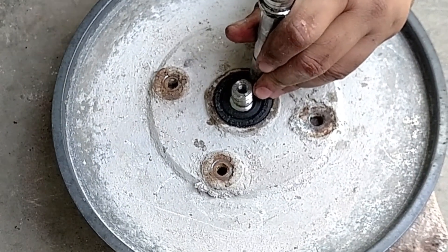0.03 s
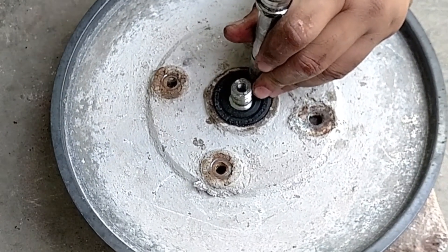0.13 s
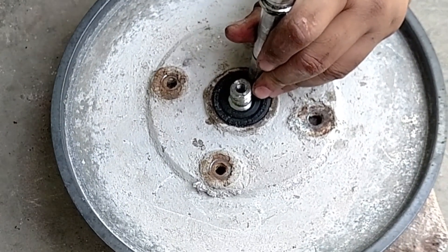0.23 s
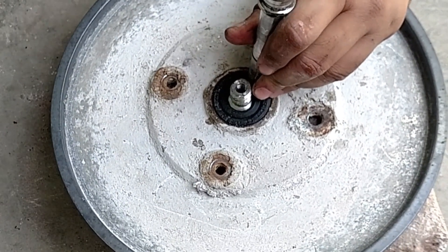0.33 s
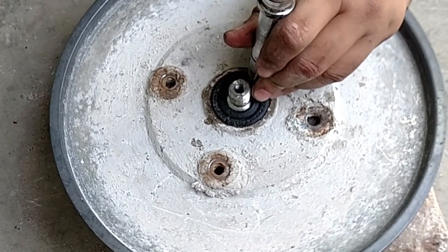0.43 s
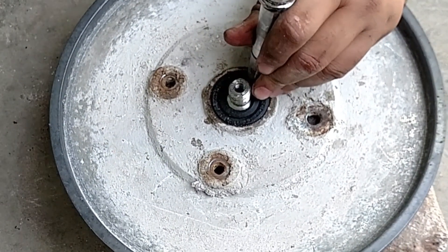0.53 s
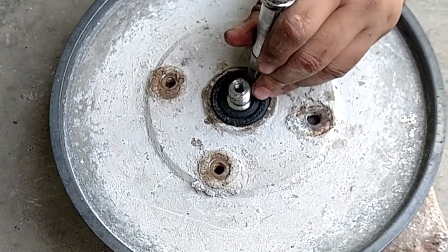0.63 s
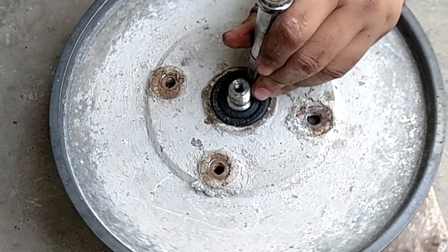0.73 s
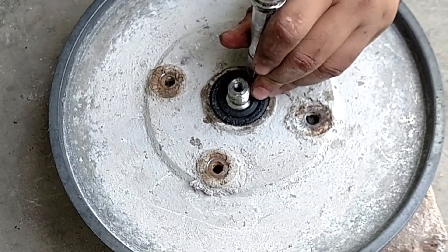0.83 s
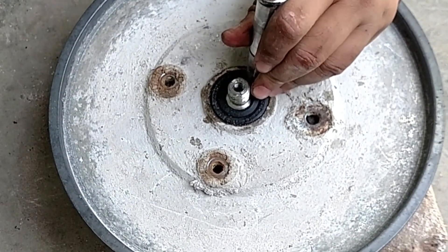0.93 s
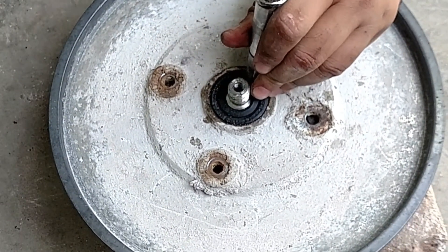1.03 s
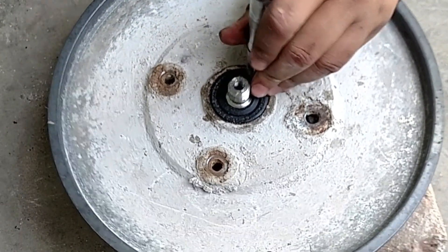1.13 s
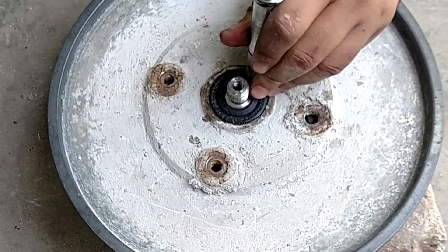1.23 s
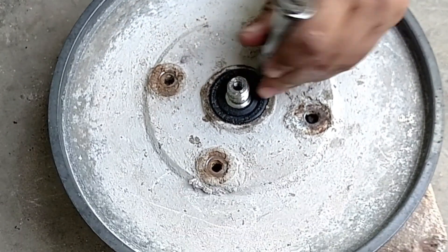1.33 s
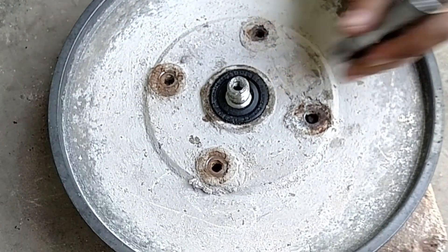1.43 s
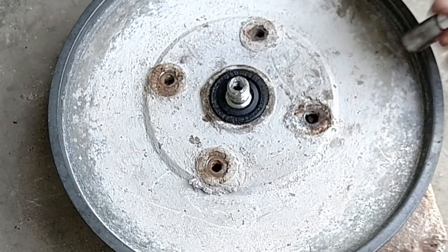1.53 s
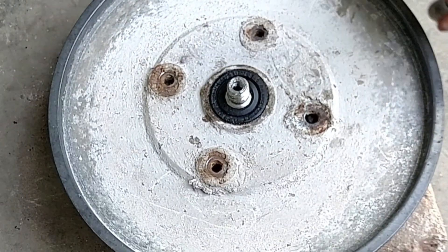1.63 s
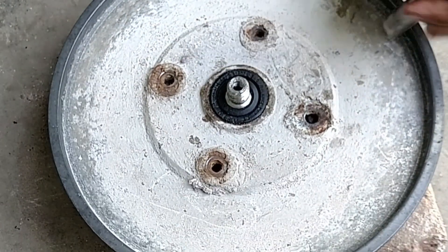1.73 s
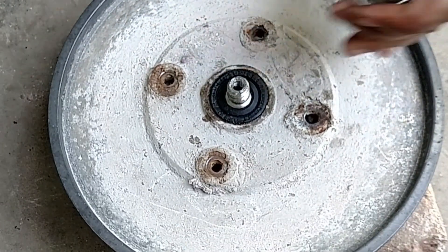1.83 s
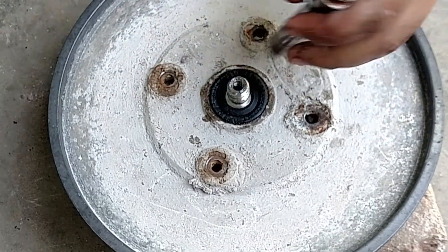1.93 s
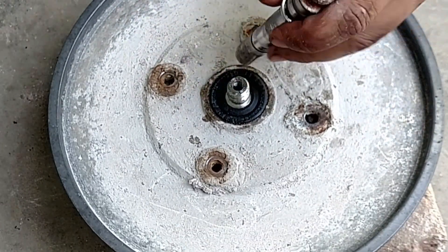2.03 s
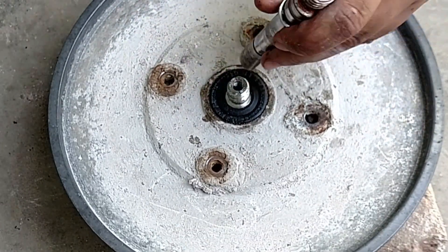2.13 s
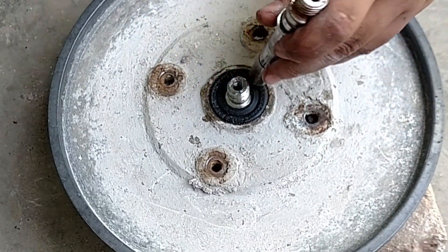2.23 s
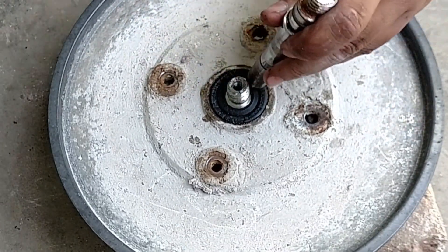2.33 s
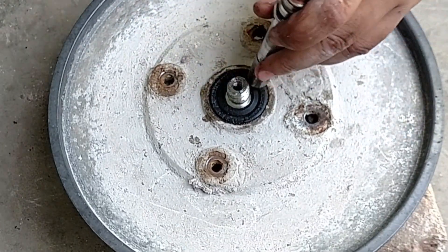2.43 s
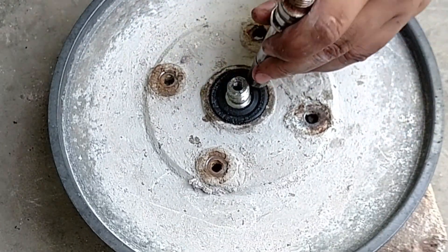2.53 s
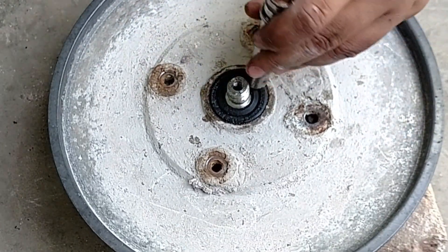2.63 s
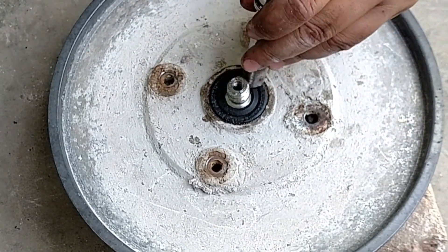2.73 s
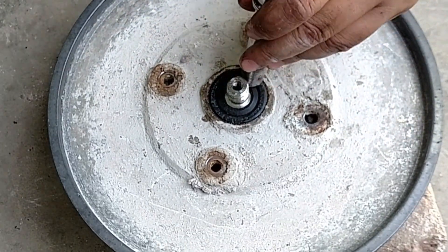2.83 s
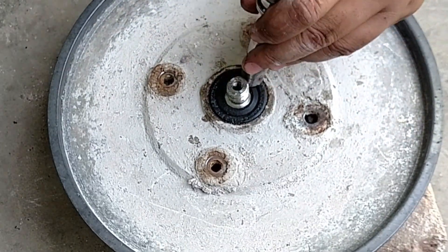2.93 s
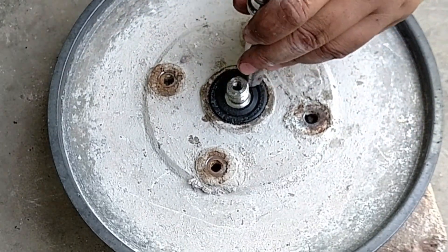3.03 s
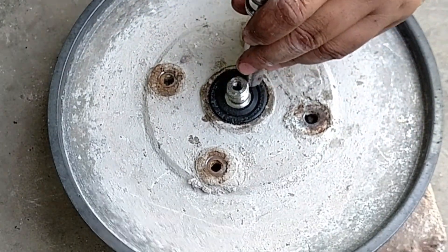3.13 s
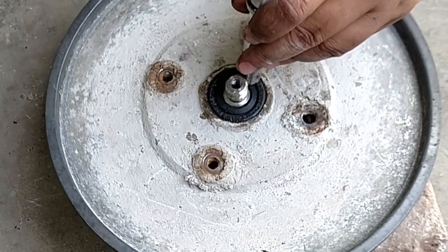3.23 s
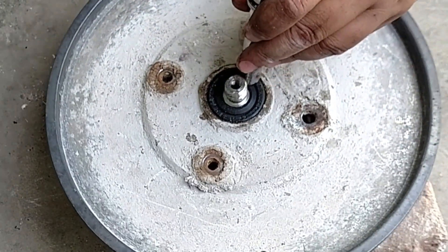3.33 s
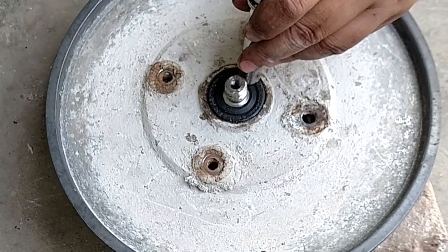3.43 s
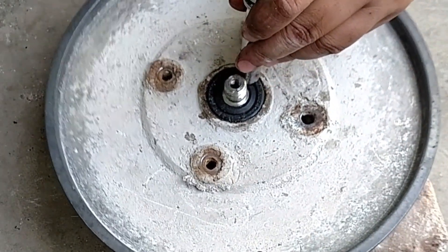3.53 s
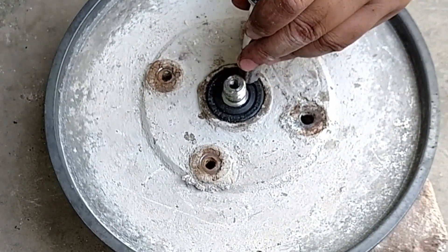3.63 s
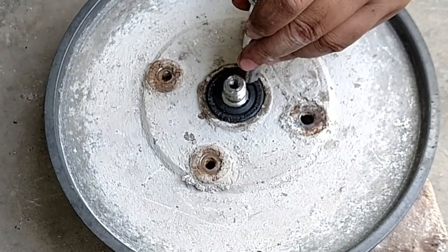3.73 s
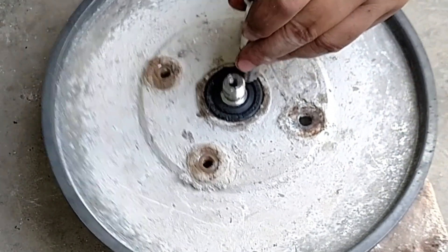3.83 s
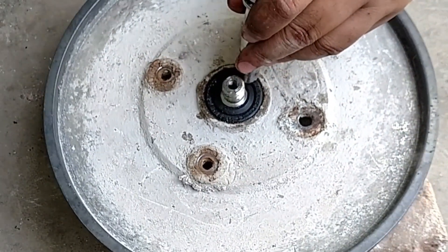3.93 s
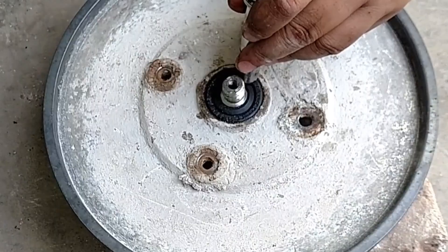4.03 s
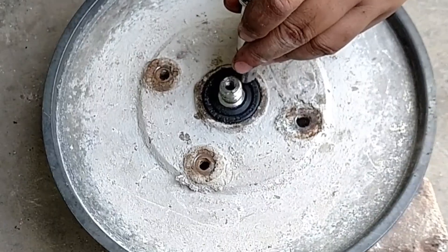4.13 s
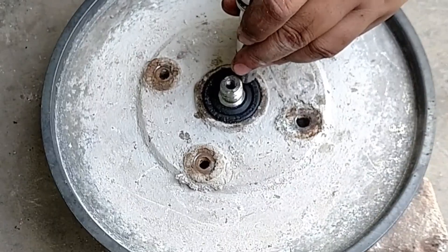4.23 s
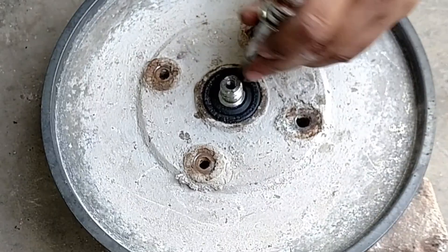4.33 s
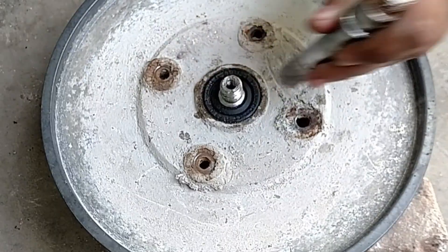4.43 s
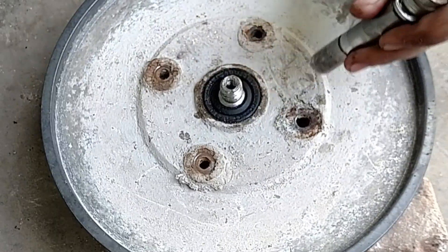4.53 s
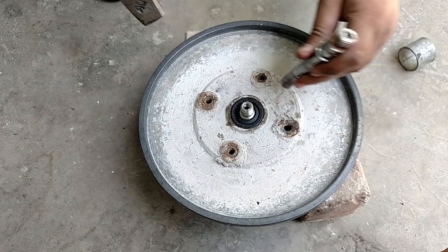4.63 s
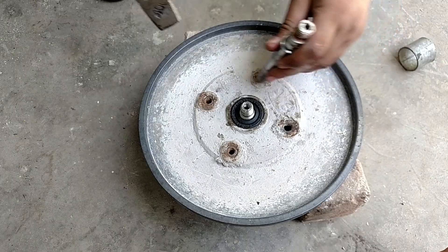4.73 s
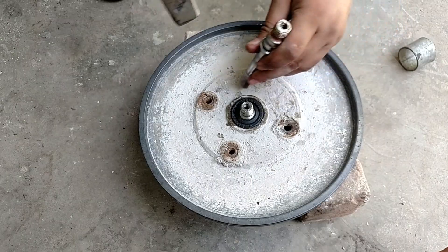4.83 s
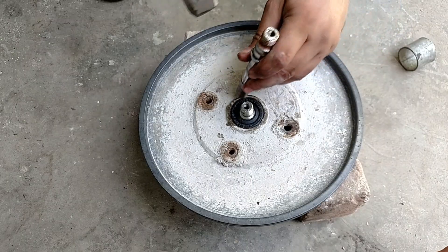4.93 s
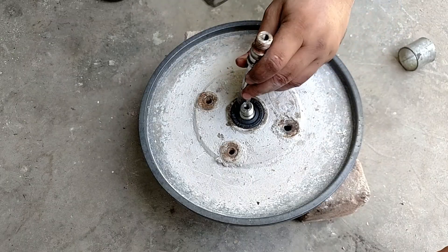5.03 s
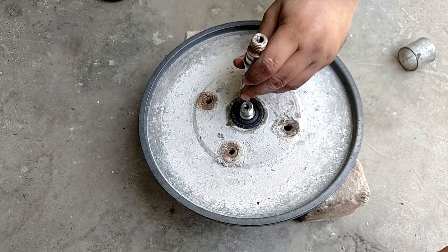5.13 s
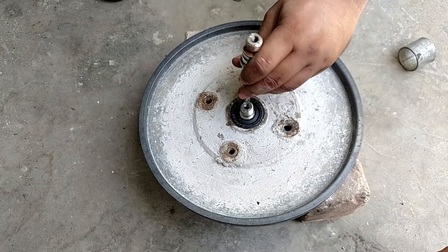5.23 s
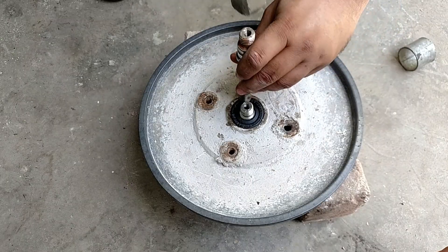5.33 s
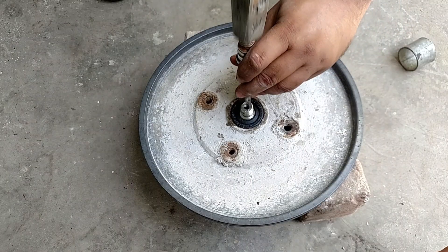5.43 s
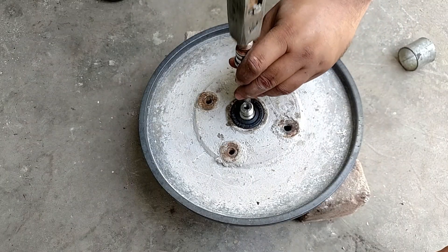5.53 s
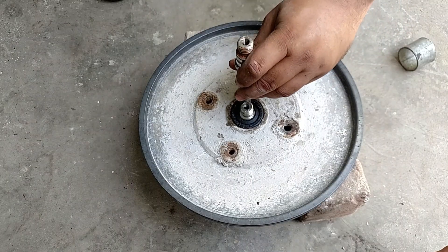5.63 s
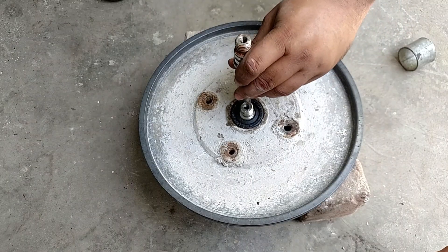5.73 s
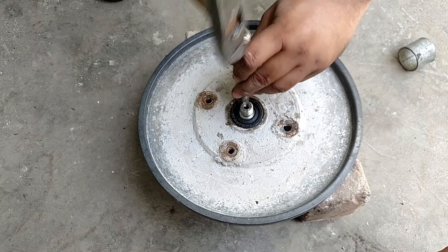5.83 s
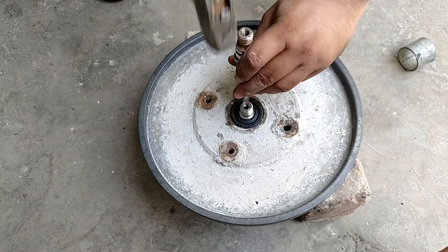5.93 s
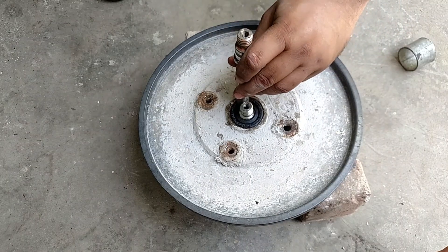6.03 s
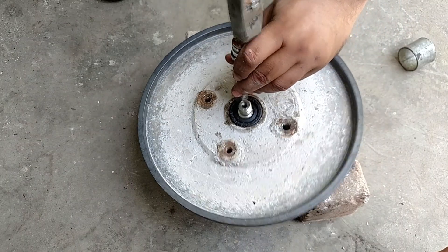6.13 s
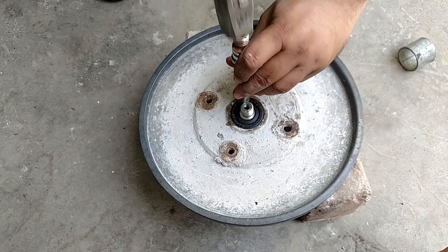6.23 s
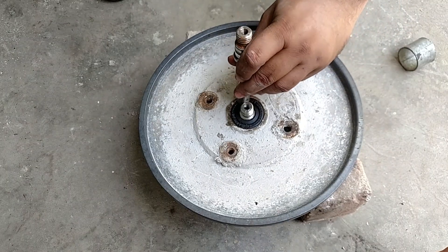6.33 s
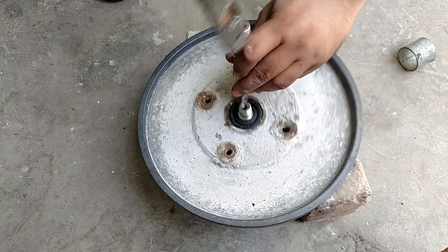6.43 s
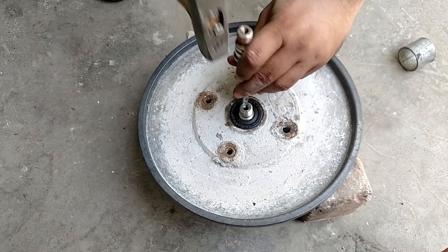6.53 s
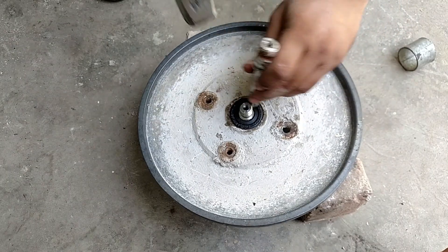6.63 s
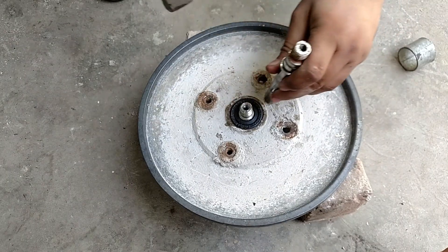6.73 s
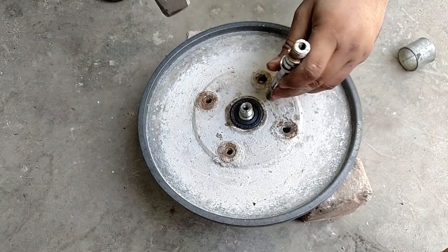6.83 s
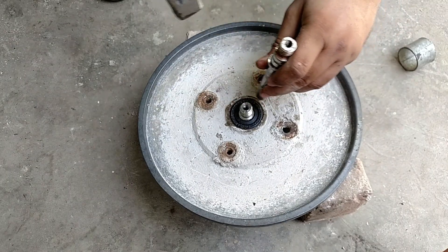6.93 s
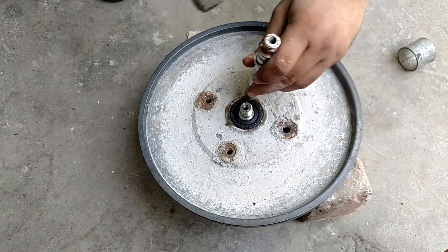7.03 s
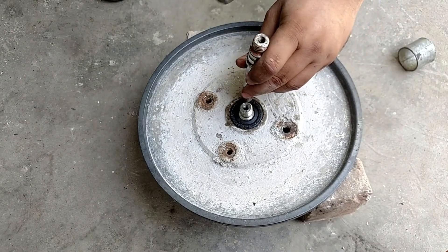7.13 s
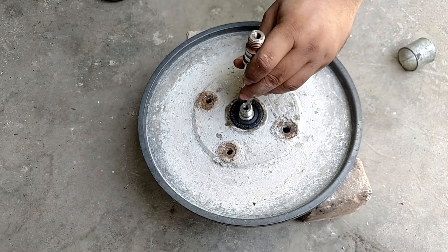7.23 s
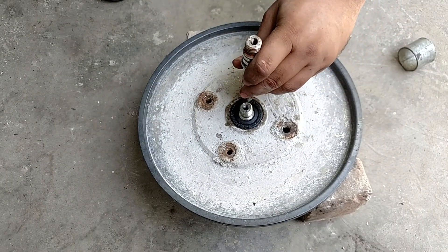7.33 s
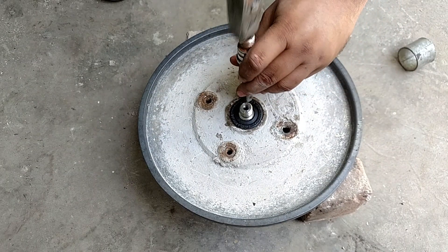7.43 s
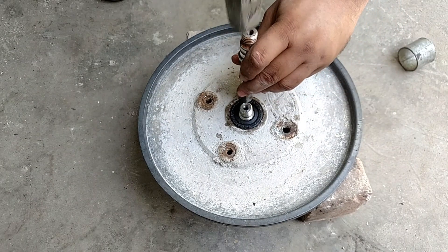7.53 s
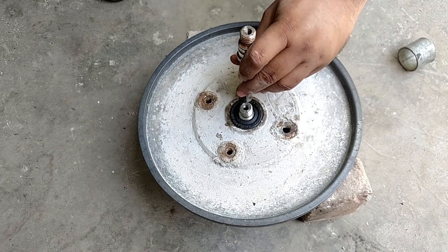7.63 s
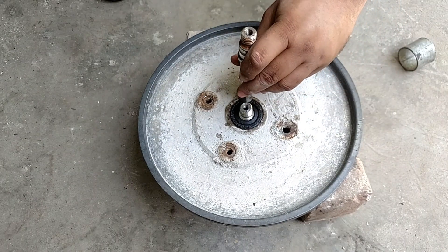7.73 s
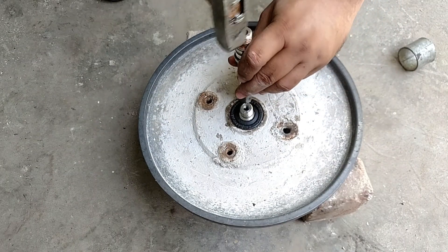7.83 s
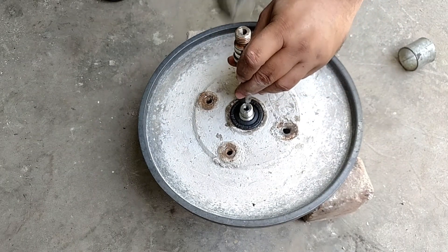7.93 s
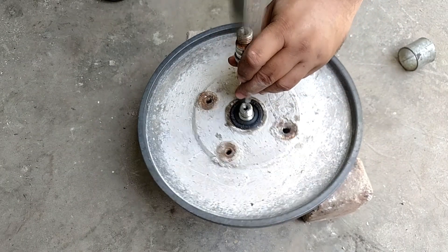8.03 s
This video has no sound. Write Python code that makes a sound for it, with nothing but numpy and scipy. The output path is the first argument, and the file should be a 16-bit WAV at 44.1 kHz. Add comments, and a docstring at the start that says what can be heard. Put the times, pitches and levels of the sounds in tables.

```python
"""A hammer taps a steel rod that drives a seal into a metal hub, lying on a block on a concrete floor.
Each blow cracks, thuds into the block and sets the hub ringing; the loose rod bounces and rattles.
A hard room rings on behind the hits, and distant traffic swells and fades outside.
The microphone is close, so the hardest blows overload it."""
import sys
import numpy as np
from scipy import signal
from scipy.fft import rfft, irfft
from scipy.io import wavfile

SR = 44100
rng = np.random.default_rng(int(sys.argv[2]) if len(sys.argv) > 2 else 0)


def file_out(sig):
    """Save sig as 16-bit WAV at sys.argv[1]."""
    # one column per channel
    cols = np.atleast_2d(sig).T
    # limit, then scale
    lim = np.clip(cols, -1, 1)
    pcm = np.round(lim * 32767).astype(np.int16)
    wavfile.write(sys.argv[1], SR, pcm)


N = 356372

# Traffic swells. Each row: time in seconds, rumble level in dB, tyre hiss level in dB.
TRAFFIC_SWELLS = [(0, -55, -56), (.8, -52.5, -66.5), (1.5, -56, -60), (1.9, -55.5, -58), (2.3, -50, -55.5),
                  (2.75, -46, -51.5), (3.3, -53.5, -59), (3.9, -59.5, -60), (4.7, -62.5, -65),
                  (5.301, -59.5, -64), (5.8, -55, -57.5), (6.4, -62, -66.5), (7.099, -64.5, -65.5),
                  (7.6, -59, -61.5), (8.08, -59, -54)]
# Tone of engines, tyres and microphone hiss. Each row: frequency in Hz, relative level in dB.
RUMBLE_EQ = [(24, -54), (40, -23.5), (129, -8), (178, -1.5), (234, -3), (345, -0.5), (496, -6.5),
             (1000, -11.5), (1300, -34), (2200, -120)]
TYRE_EQ = [(410, -22), (700, -4.5), (1630, -5.5), (2160, -7.5), (3370, -19.5), (3960, -29), (7000, -43),
           (9100, -70.5), (15400, -120)]
MIC_EQ = [(1760, -36.5), (3000, -4.5), (3690, -5.5), (4430, -8), (8400, -15.5), (13500, -16.5),
          (16400, -24)]
# Fader of a thin high whine. Each row: time in seconds, level in dB.
WHINE_FADER = [(1.7, -110), (2.2, -107), (2.8, -92), (3.3, -100), (3.8, -115)]
# Room reverb. Each row: band in Hz, early echoes in dB, their t60 in seconds, tail in dB,
# its t60 in seconds.
ROOM_BANDS = [(151, -23, .1, -36.5, 0.28), (300, -16.5, 0.062, -26, 0.35), (640, -5.5, 0.079, -16.5, 0.68),
              (840, -9, 0.19, -27, 0.63), (1200, -2, 0.05, -18.5, 0.66), (1980, 8.5, 0.095, -13.5, 0.67),
              (2300, 4, 0.14, -18, 0.71), (3150, 3, 0.053, -20.5, 0.56), (3960, -10.5, 0.077, -28.5, .45),
              (4700, -25.5, 0.092, -33.5, 0.32), (6300, -32.5, 0.07, -42, 0.15),
              (7450, -29.5, 0.081, -36, .3), (9600, -37, 0.098, -50.5, 0.44),
              (11700, -44, 0.31, -49.5, .25), (14500, -51.5, .08, -61.5, .15)]
# Stray pings. Each row: start in seconds, nominal level in dB, pitch in Hz.
PING_CUES = [(1.189, -22, 880), (1.462, -35.5, 670), (1.81, -39, 876), (3.285, -26, 930),
             (3.353, -30, 1010), (3.946, -24, 920), (4.013, -34, 1010), (6.224, -28.5, 614)]

# The layers of a hit. Each row: pitch in Hz, level in dB, t60 in seconds.
HUB_MODES = [(333, -28, 0.99), (432, -5, 0.6), (602, -1, 0.5), (953, -18.5, 0.36), (1077, -14.0, 0.2),
             (1244, -9.5, 0.64), (1562, 1.0, 0.11), (1672, -12, 0.46), (1775, -6.0, 0.13),
             (1960, -15.5, 0.13), (2177, -12.5, 0.16), (2180, -15.5, 0.17), (2300, 0, 0.23),
             (2723, -25.0, 0.42), (3060, -22.0, 0.14), (3296, -15, 0.25), (3125, -22, 0.93),
             (3370, -24.5, 0.34), (3300, -26.5, 0.4), (3880, -31.5, 0.48), (3990, -29.5, 0.35),
             (4810, -19.5, 0.34), (5106, -37.5, 0.37), (7340, -28.5, 0.14), (9700, -30.5, 0.2),
             (10700, -35.5, 0.15), (10700, -41.5, 0.2), (11850, -23.5, 0.19), (558, -7.5, .4),
             (5615, -35, .24)]  # long ring of hub and rod
ROD_MODES = [(942, -10.5, .1), (1243, -27.5, .9), (1605, 1, .15), (1770, -17, 0.44), (2140, -13, .2),
             (2310, -6.5, .16), (2660, -12.5, 0.2), (4090, -25, 0.23), (5630, -27, 0.1)]  # free ring of the loose rod
BOWL_MODES = [(326, -12, 0.03), (601, 0.5, 0.023), (880, -5, 0.016)]  # hollow body of the hub, damped by the hand
CRACK_MODES = [(1200, -6.5, 0.007), (1488.6, -13.5, 0.011), (2962, -4.5, 0.011), (3660, -12, 0.011)]  # midrange bite
TREBLE_MODES = [(5000, 2.5, 0.0051), (6220, -15.5, 0.00082), (7470, -3.5, 0.0067), (9640, -9, 0.0031),
                (11740, -5.5, 0.0054), (14500, -21, 0.0047)]  # bright edge of the attack
CLINK_MODES = [(3297, -2.5, .035), (4270, -9, 0.044), (5120, -9, 0.02)]  # hammer on rod, plainest in light taps

# The loose rod knocks against the hub. Each row: start in seconds, crack level in dB, crack pitch
# in Hz, then treble and rod ring in dB relative to the crack.
BOUNCE_CUES = [(0.1705, -20.5, 2180, -13, -16), (0.4834, -12.5, 1810, -24, -16),
               (0.4995, -20, 2200, -17.5, -14), (0.8281, -12.5, 2310, -34, -8.5),
               (1.151, -7, 1810, -23, -14), (1.63, -15, 2590, -20.5, -2), (1.644, -17, 2300, -43, -15),
               (3.222, -13.5, 2300, -24.5, -16), (3.2457, -14.5, 2270, -30, -14.5),
               (3.566, -13.5, 2300, -26.5, -19), (3.872, -10, 2290, -28.5, -13),
               (4.1747, -10.5, 2720, -33, -19), (5.8682, -14, 2300, -22, -13.5),
               (5.9, -16, 2390, -29.5, -19.5), (6.196, -11, 2200, -25, -16.5),
               (6.482, -12, 1750, -26.5, -13), (6.5216, -14.5, 1960, -48, -18),
               (6.6737, -37.5, 1930, -40, -11), (7.8294, -17.5, 2080, -34, -12)]
# Hammer blows and light touches. Each row: start in seconds, crack level in dB, crack pitch in Hz,
# then thud, bowl, treble and room send in dB relative to the crack, and rim tone boost in dB.
BLOW_CUES = [(0.1328, -8.5, 2310, -24, 1, -7.5, -21, 7), (0.456, -4, 2230, -32, 0, -8.5, -27, -1),
             (0.8003, -3.5, 2270, -40, -1, -10.5, -24, -13.5),
             (1.1234, -4.5, 2300, -37, 0, -9.5, -23.5, -8), (1.4616, -40.5, 2030, -21, -8.5, -38, -11, 4),
             (2.836, -4.5, 2150, -30, -1, -13, -24.5, -12.5),
             (3.1964, 3.5, 2430, -30.5, -8, -17.5, -22.5, 1), (3.542, 4.5, 2210, -9, -8, -18.5, -24, -1),
             (3.8504, 4, 2353, -6.5, -10, -19, -18.5, 1.5), (4.1344, 3, 2250, -11.5, -8.5, -16, -19.5, 2),
             (5.0809, -17.5, 2020, -41, -17.5, -49, -21, 2), (5.4991, -18, 2030, -21, 1, -18.5, -25.5, 11),
             (5.8443, 2, 2340, -11, -3.5, -14.5, -28.5, 1), (6.1729, 5, 1668, -3, -9, -19.5, -23, 3),
             (6.4608, 2.5, 2918, -18.5, -7, -20, -19.5, -1.5),
             (7.2499, -18, 2070, -47.5, -28.5, -46.5, -23, 0),
             (7.4911, -18.5, 2180, -27, 0.5, -16, -22, -11),
             (7.805, 6, 2300, -13, -8.5, -19.5, -25.5, 19.5)]

ECHO_MODES_DB, TOP_HZ = 9, 16500
PLAIN_BOWL_DB, PLAIN_TREBLE_DB = -8, -23  # a hit of this colour adds no bass or treble tilt
SHIMMER_PER_DB = -.5  # light blows ring brighter at the very top
THUD_HZ, THUD_T60_S = 138.4, 0.012
RIM_HZ, RADIATES_HZ = 1250, 220  # rim tone; low cut, as the hub is too small to radiate bass
CLINK_DB, CLINK_PER_DB = -5.5, -0.43  # relative to the treble of the hit
RING_DB, RING_PER_DB = -34, -0.5  # hard blows ring less for the size of their crack
HELD_ROD_DB = -31  # pressed on the seal, the rod hardly rings
CONTACT_MS, CHATTER_MS, CHATTER_MS_PER_DB = .25, 4.11, -0.1  # hard blows chatter more briefly
BLOW_TOUCH = dict(rod_db=HELD_ROD_DB, rise_ms=1.6, strike=0.86)
BOUNCE_TOUCH = dict(thud_db=-28, bowl_db=-8, rim_db=0, ring_db=-26, chatter_ms=4.7, rise_ms=0.51,
                    strike=.6)
BOUNCE_ROOM_DB = -20


def undb(db):
    """Gain of a dB value."""
    return 10 ** (np.asarray(db) / 20)


def convolve(a, b):
    """a through the response b, as long as a."""
    return signal.fftconvolve(a, b)[:len(a)]


def peak(x, db):
    """x scaled to a peak level."""
    return x * undb(db) / np.max(np.abs(x))


def fade_in(x, seconds):
    """x with a linear attack."""
    return x * np.minimum(np.arange(len(x)) / SR / seconds, 1)


def ring(modes, seconds, scatter_db, detune=0.):
    """Decaying sines; every blow lands elsewhere, so it shares its energy anew among them."""
    hz, db, t60 = np.transpose(modes)[:, :, None]
    polarity, level, pitch = rng.standard_normal((3, len(hz), 1))
    t = np.arange(int(seconds * SR)) / SR
    gain = np.sign(polarity) * undb(db + scatter_db * level - 60 * t / t60)
    return np.sum(gain * np.sin(2 * np.pi * hz * (1 + detune * pitch) * t), axis=0)


def noise_bed(eq, flicker_db, rate_hz):
    """Shaped noise of rms 1; each third-octave wavers on its own."""
    hz, db = np.transpose(eq)
    f = np.maximum(np.arange(N // 2 + 1) * SR / N, 1.)
    spectrum = rfft(rng.standard_normal(N)) * undb(np.interp(np.log(f), np.log(hz), db, -90, -90))
    band, step, out = np.floor(3 * np.log2(f)), int(SR / rate_hz), 0
    for b in range(int(3 * np.log2(hz[0])), int(3 * np.log2(hz[-1])) + 1):
        knots = rng.standard_normal(N // step + 2)
        waver = np.interp(np.arange(N) / step, np.arange(len(knots)), knots)
        out = out + irfft(spectrum * (band == b), N) * undb(flicker_db * waver)
    return out / np.std(out)


def tilt(hz, db, bowl_db, treble_db):
    """EQ in dB that makes ring and reverb follow the bass and treble of the hit."""
    shimmer = SHIMMER_PER_DB * max(db, -10) * np.clip((hz - 8500) / 2000, 0, 1)
    bass, treble = 1.8 * (bowl_db - PLAIN_BOWL_DB), 1.2 * (treble_db - PLAIN_TREBLE_DB)
    return shimmer + np.interp(np.log(hz), np.log([500, 1100, 3300, 5000]), [bass, 0, 0, treble])


def traffic():
    """Engine rumble and tyre hiss, each riding its own swells."""
    t = np.arange(N) / SR
    times, rumble_db, tyre_db = np.transpose(TRAFFIC_SWELLS)
    rumble = noise_bed(RUMBLE_EQ, flicker_db=2.5, rate_hz=9) * undb(np.interp(t, times, rumble_db))
    tyres = noise_bed(TYRE_EQ, flicker_db=1.6, rate_hz=12) * undb(np.interp(t, times, tyre_db))
    return rumble + tyres


def whine(hz=10847):
    """A very faint high tone that swells once."""
    t = np.arange(N) / SR
    return np.sin(2 * np.pi * hz * t) * undb(np.interp(t, *np.transpose(WHINE_FADER)))


def room(hits):
    """Echoes too dense to tell apart: band noise that jumps at each hit, then dies in two stages."""
    hz, early_db, early_t60, late_db, late_t60 = np.transpose(ROOM_BANDS)[:, :, None]
    t = np.arange(SR) / SR
    decay = undb(early_db - 60 * t / early_t60) ** 2 + undb(late_db - 60 * t / late_t60) ** 2
    decay *= np.clip((t - .002) / 0.0085, 0, 1)  # pre-delay and build-up
    power = np.zeros((len(hz), N + SR))
    for start, room_db, hit in hits:
        send_db = hit["db"] + room_db + tilt(hz, hit["db"], hit["bowl_db"], hit["treble_db"])
        power[:, int(start * SR):int(start * SR) + SR] += decay * undb(send_db) ** 2
    f = np.maximum(np.arange(N // 2 + 1) * SR / N, 1.)
    # the reverb carries the modes of the hub as narrow, rough bands
    resonances = sum(1 / (1 + ((f - mode) / (3.8 + 0.0041 * mode)) ** 2) for mode, *_ in HUB_MODES)
    spectrum = rfft(rng.standard_normal(N)) * np.sqrt(1 + undb(ECHO_MODES_DB) ** 2 * resonances)
    centres, out = np.log(np.r_[hz[0] / 2, hz[:, 0], TOP_HZ]), 0
    for k in range(len(hz)):
        crossover = np.interp(np.log(f), centres, np.arange(len(centres)) == k + 1)
        band = irfft(spectrum * crossover, N)
        out = out + band / np.std(band) * np.sqrt(power[k, :N])
    return out


def pings():
    """Short lone rings in the tails, as of a loose part that touches the hub again."""
    out = np.zeros(N + SR)
    for start, db, hz in PING_CUES:
        tone = ring([(hz, db, .045)], seconds=.15, scatter_db=1.0)
        out[int(start * SR):int(start * SR) + len(tone)] += fade_in(tone, .003)
    return out[:N]


def block_thud(db):
    """The block under the hub answers a little late, with one or two slow swings."""
    t = np.arange(int(0.021 * SR)) / SR
    swing = t * undb(-60 * t / THUD_T60_S) * np.sin(2 * np.pi * THUD_HZ * t)
    return peak(np.gradient(swing), db)


def hub_ring(hz, db, bowl_db, treble_db, rim_db):
    """The sustain of the hub: every mode is a close pair that beats."""
    modes = np.array(HUB_MODES, float)
    mode_hz = modes[:, 0]
    modes[:, 1] += tilt(mode_hz, db, bowl_db, treble_db)
    modes[:, 1] += 7 * np.exp(-(np.log(mode_hz / hz) / 0.15) ** 2)  # driven hardest near the crack
    modes[:, 1] += rim_db * (abs(mode_hz - RIM_HZ) < 60)  # depends on where the rod stands
    return (ring(modes, .8, 2.5, detune=.002) + ring(modes, .8, 2.5, detune=.004)) / 4


def steel_chatter(chatter_ms, rise_ms, strike):
    """The exciter: steel faces meet and chatter for a few milliseconds."""
    ms = 1000 * np.arange(int(0.021 * SR)) / SR
    envelope = .16 * np.minimum(ms / rise_ms, 1) * np.exp(-(ms / chatter_ms) ** 2)
    chatter = envelope * rng.standard_normal(len(ms))
    chatter[[8, 30]] = .15 * strike, strike  # a first touch, then the blow
    return chatter


def crack(chatter, hz, db, bowl_db, treble_db):
    """The attack: chatter excites a pitched bite, a hollow bowl, a bright edge and a clink."""
    # the contact lasts a moment, so the lower resonances get a rounded push
    push = convolve(chatter, np.hanning(int(CONTACT_MS * SR / 1000)))
    bite = convolve(ring(CRACK_MODES + [(hz, 0, .016)], .15, 0.96, 0.022), push)
    bowl = convolve(ring(BOWL_MODES, .15, 1.0, 0.016), push)
    edge = convolve(ring(TREBLE_MODES, .15, 0.92, 0.017), chatter)
    clink = convolve(ring(CLINK_MODES, .15, 1.0, 0.0065), push)
    clink_db = treble_db + CLINK_DB + CLINK_PER_DB * db
    return peak(bite, 0) + peak(bowl, bowl_db) + peak(edge, treble_db) + peak(clink, clink_db)


def steel_hit(db, hz, thud_db, bowl_db, treble_db, rim_db, ring_db, rod_db, chatter_ms, rise_ms, strike):
    """One blow or bounce: a crack on top, hub and rod ringing on, the block thudding underneath."""
    attack = crack(steel_chatter(chatter_ms, rise_ms, strike), hz, db, bowl_db, treble_db)
    out = undb(ring_db) * fade_in(hub_ring(hz, db, bowl_db, treble_db, rim_db), 0.0031)
    out += undb(rod_db) * fade_in(ring(ROD_MODES, .8, scatter_db=1.5, detune=0.0017), 0.0022)
    out[:len(attack)] += attack
    out = signal.sosfilt(signal.butter(2, RADIATES_HZ, "high", fs=SR, output="sos"), out)
    thud = block_thud(thud_db)
    out[:len(thud)] += thud
    return out * undb(db)


def hit_cues():
    """Every blow and bounce as start in seconds, room send in dB and settings for steel_hit."""
    for start, db, hz, thud_db, bowl_db, treble_db, room_db, rim_db in BLOW_CUES:
        yield start, room_db, dict(
            BLOW_TOUCH, db=db, hz=hz, thud_db=thud_db, bowl_db=bowl_db, treble_db=treble_db,
            rim_db=rim_db, ring_db=RING_DB + RING_PER_DB * db,
            chatter_ms=max(CHATTER_MS + CHATTER_MS_PER_DB * db, 1))
    for start, db, hz, treble_db, rod_db in BOUNCE_CUES:
        yield start, BOUNCE_ROOM_DB, dict(BOUNCE_TOUCH, db=db, hz=hz, treble_db=treble_db, rod_db=rod_db)


def scene():
    """The mono mix: close hits and their reverb over the traffic bed."""
    hits = list(hit_cues())
    close = np.zeros(N + SR)
    for start, _, hit in hits:
        sound = steel_hit(**hit)
        close[int(start * SR):int(start * SR) + len(sound)] += sound
    return (close[:N] + pings() + room(hits) + traffic() + whine())[None]


def record(dry):
    """Microphone hiss, hard clipping, a coupling capacitor slow to settle, and a steep high cut."""
    hiss = noise_bed(MIC_EQ, flicker_db=.5, rate_hz=10) * undb(-74)
    clipped = np.clip(dry + hiss, -.93, .93)
    coupled = signal.sosfilt(signal.butter(1, 1.5, "high", fs=SR, output="sos"), clipped)
    return signal.sosfilt(signal.ellip(12, .2, 90, TOP_HZ, fs=SR, output="sos"), coupled)


dry = scene()
out = record(dry)
file_out(out)
```